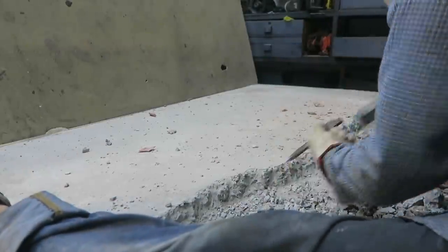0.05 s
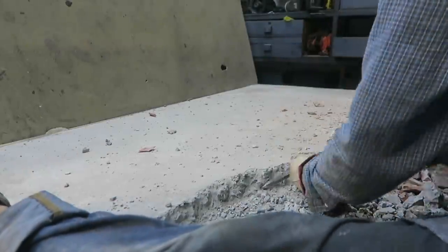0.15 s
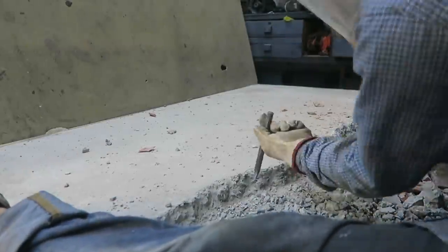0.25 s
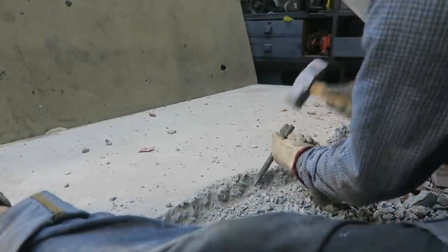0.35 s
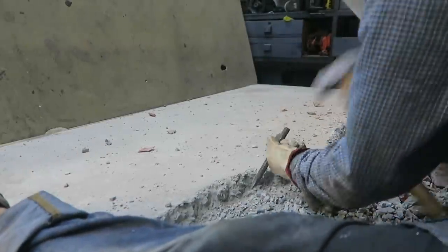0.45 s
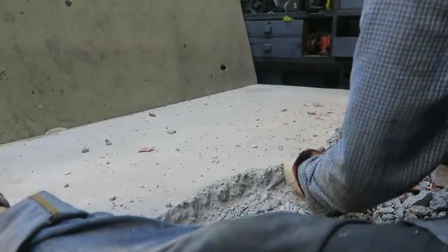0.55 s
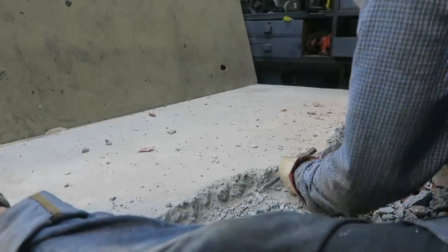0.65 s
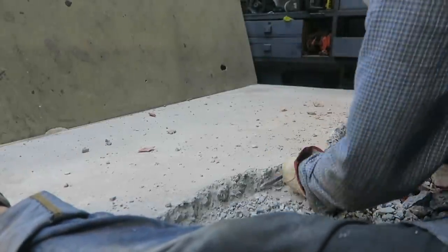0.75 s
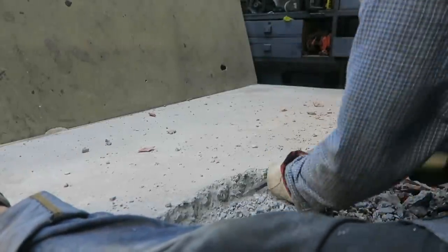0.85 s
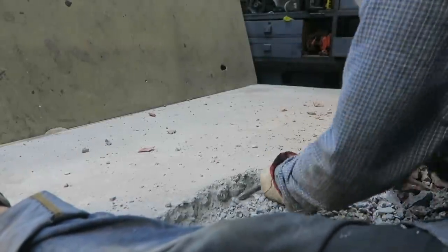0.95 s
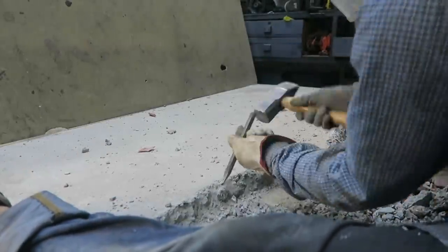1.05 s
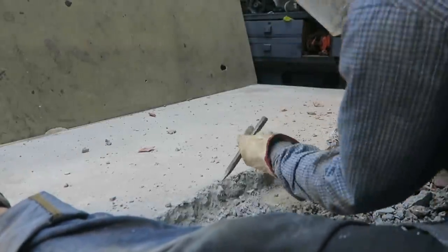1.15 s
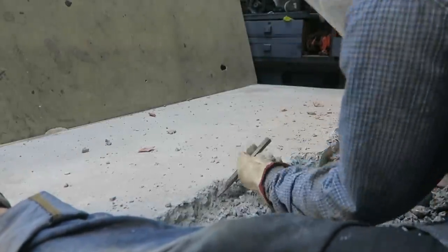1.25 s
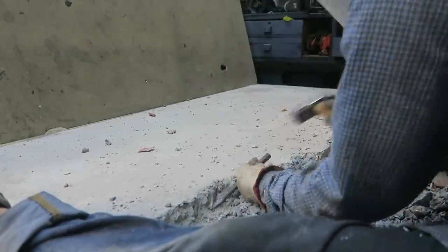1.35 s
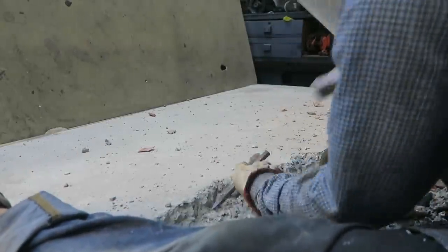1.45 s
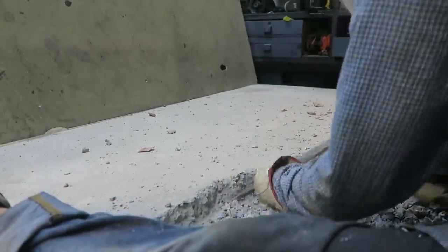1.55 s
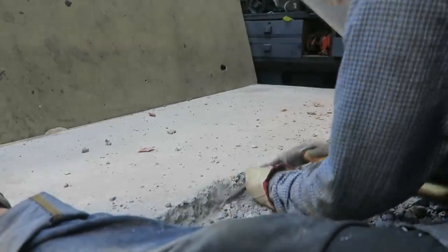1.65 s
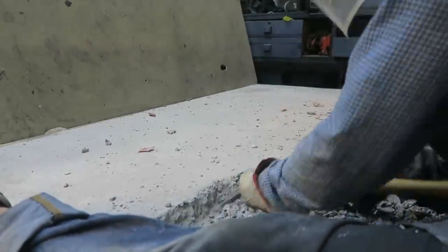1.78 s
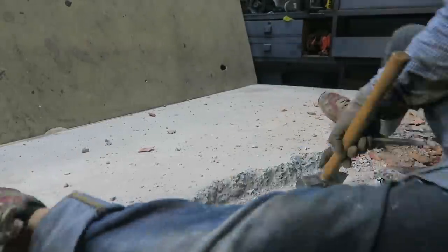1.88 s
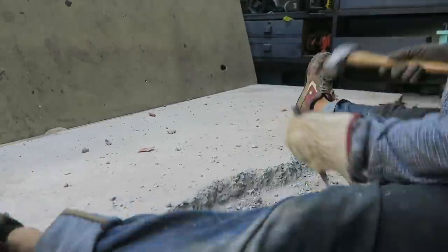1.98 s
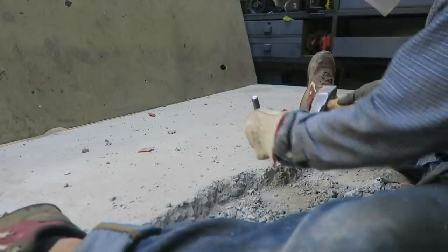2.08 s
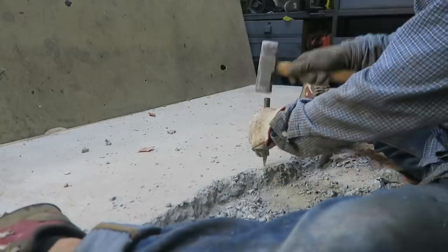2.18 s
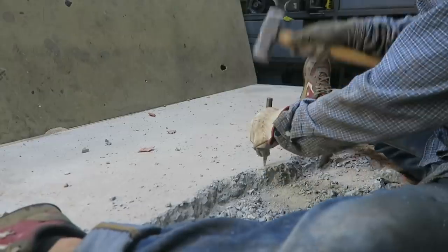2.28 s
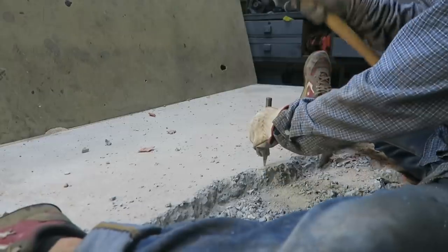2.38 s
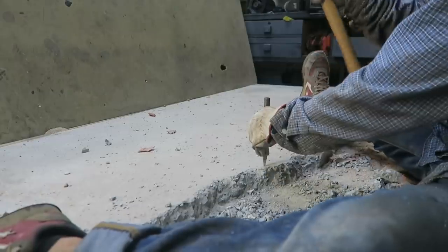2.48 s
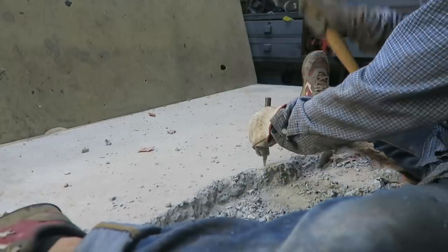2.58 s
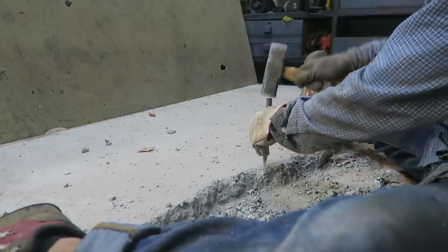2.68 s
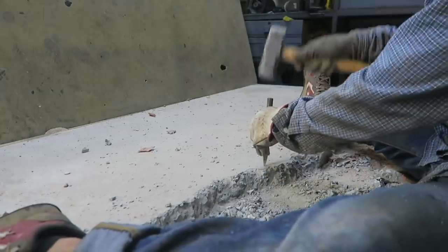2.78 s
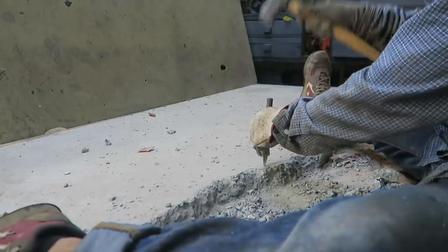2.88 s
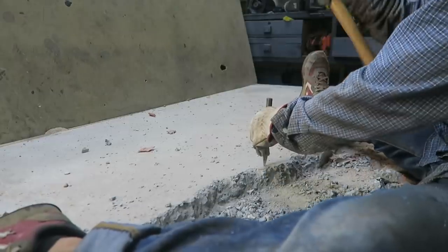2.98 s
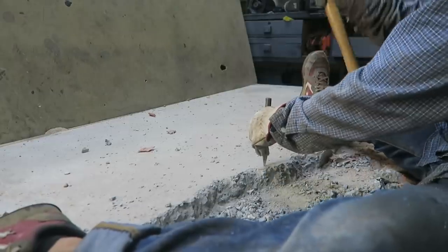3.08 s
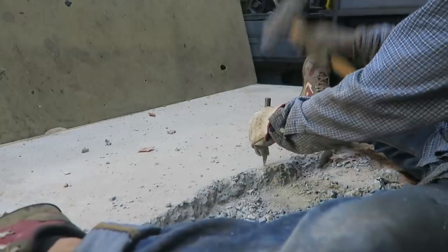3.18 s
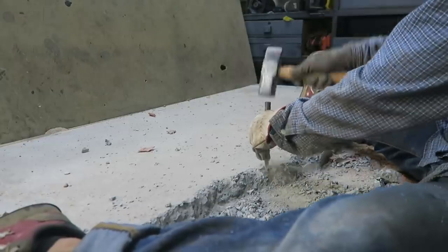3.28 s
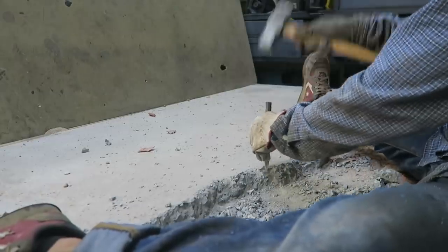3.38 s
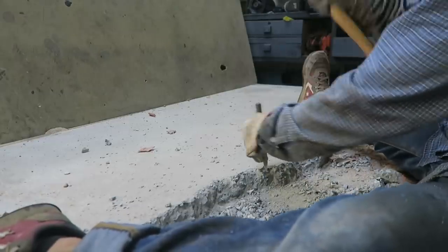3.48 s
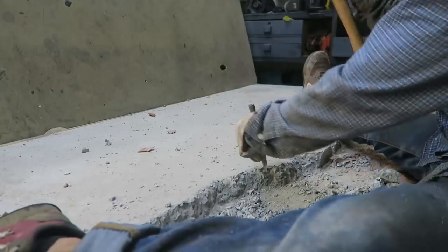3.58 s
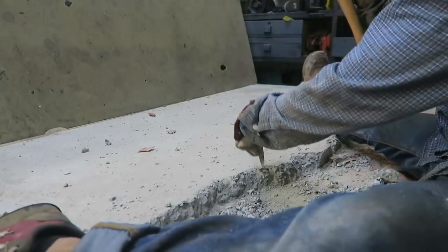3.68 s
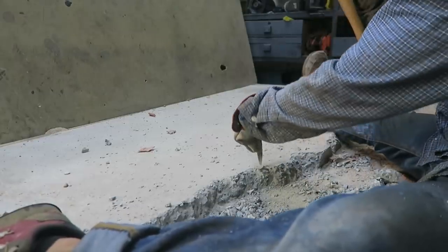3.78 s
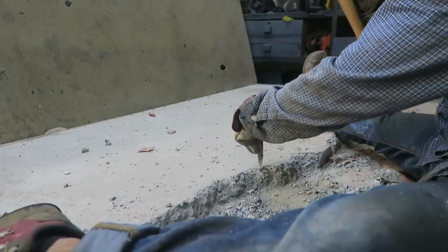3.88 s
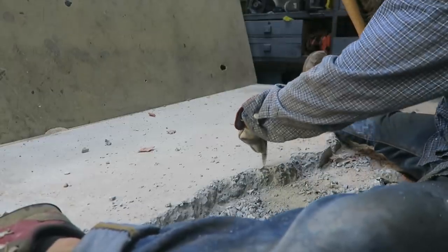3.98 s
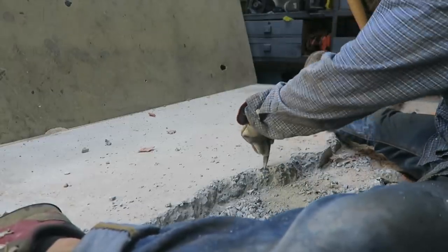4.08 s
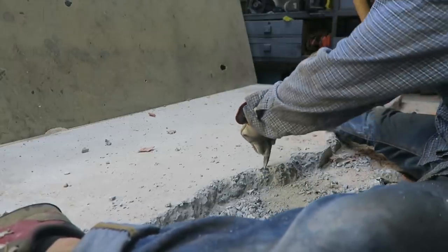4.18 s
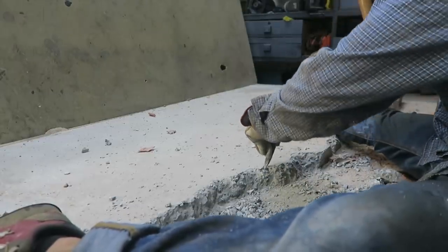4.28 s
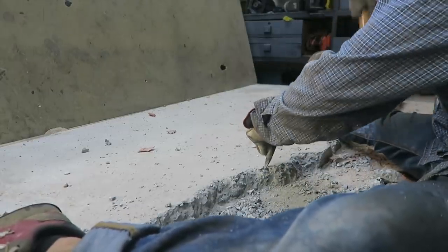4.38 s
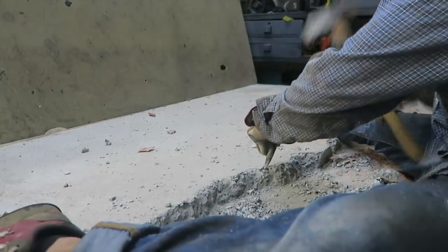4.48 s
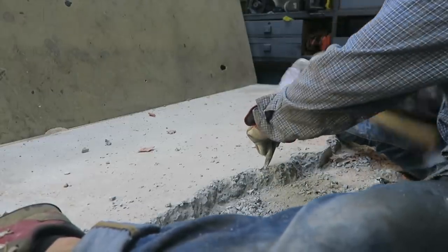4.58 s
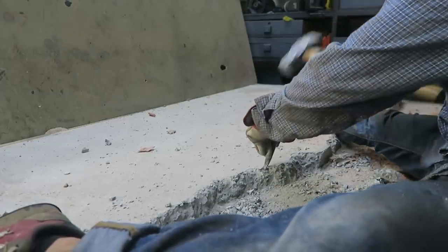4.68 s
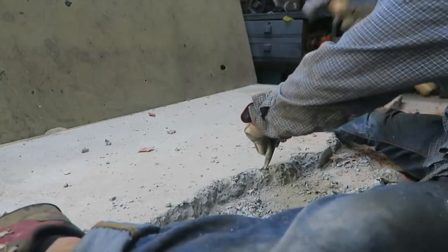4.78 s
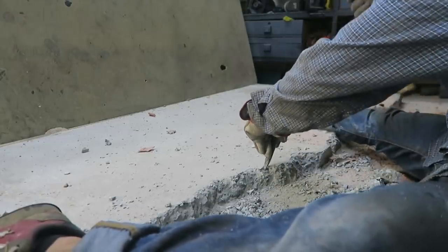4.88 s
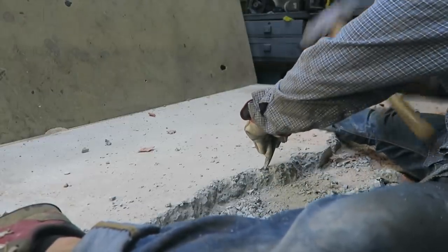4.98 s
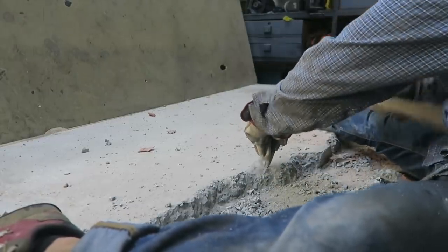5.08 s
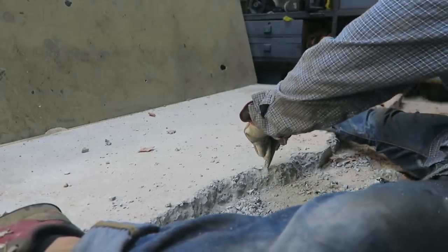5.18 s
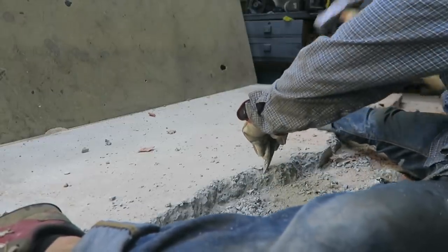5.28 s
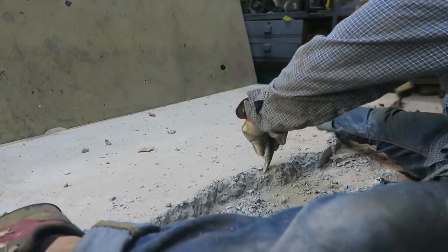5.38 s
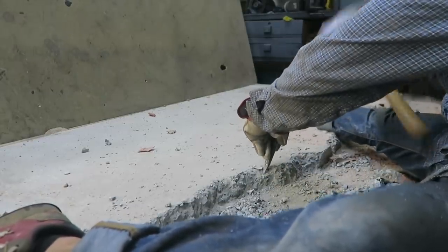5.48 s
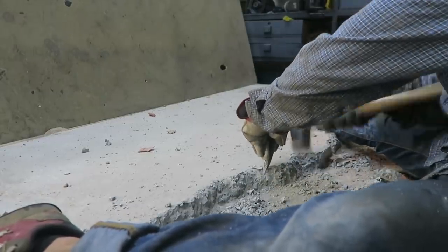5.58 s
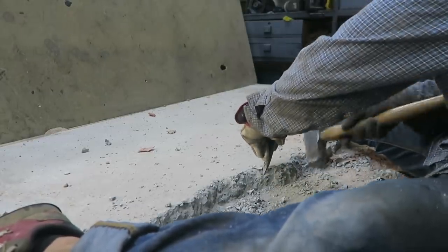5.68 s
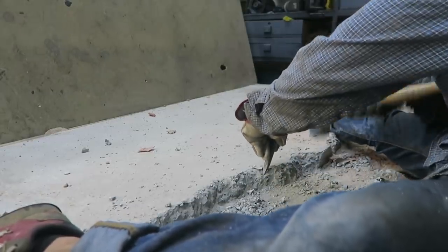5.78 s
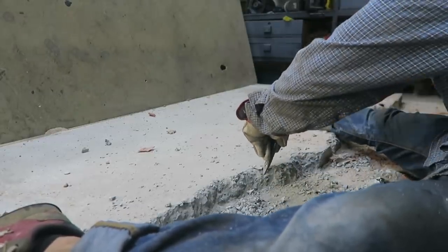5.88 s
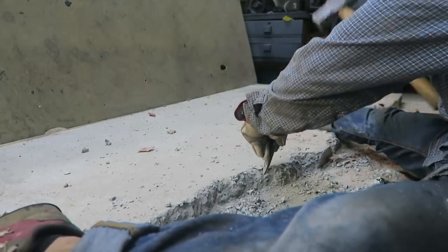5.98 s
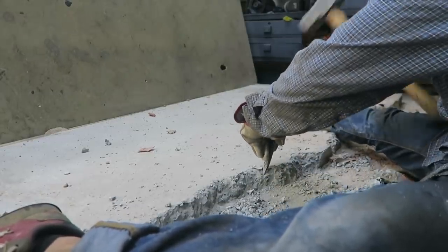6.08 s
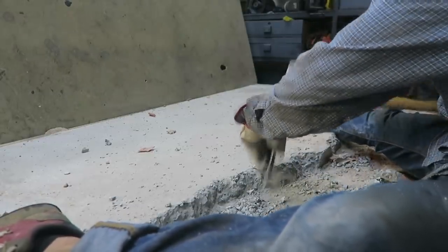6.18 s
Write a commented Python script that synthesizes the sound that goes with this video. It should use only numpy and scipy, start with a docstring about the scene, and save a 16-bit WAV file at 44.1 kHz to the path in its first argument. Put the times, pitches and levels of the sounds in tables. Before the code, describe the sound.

From 0 to about 2.2 seconds, chiselling work runs greatly sped up: dense bursts of tiny, sharp ticks, roughly forty a second within a burst, over a bright grainy hiss that swells and dips, with brief swishes near 1.1 and 1.3 seconds and a stronger rush just before 2. Then true speed begins abruptly. A hammer strikes a steel chisel in concrete at 2.2, 2.75, 3.3, 4.6, 5.1 and 5.6 seconds. Each blow is a hard midrange knock with a dull slab thump, a short crushing crackle, damped steel ringing and a brief workshop reverberation. The first rings highest, the second is loudest, and the last is softer and duller. Between blows, low rumble, soft rustling and padded bumps follow the worker shifting; two light chisel taps come near 4.2. Close miking, with clipped peaks.

```python
"""First comes a rush of tiny ticks over a hiss: the work goes by about twenty times too fast for two seconds.
Then a hammer drives a steel chisel into a concrete slab in a workshop: six blows at true speed.
Each blow adds a knock, a dull slab note, a burst of crushing noise, ringing steel and the room's answer.
Between the blows are dull bumps, a soft rustle and two light taps; the loudest peaks clip."""
import sys
import numpy as np
from scipy import signal
from scipy.fft import rfft, irfft
from scipy.io import wavfile

SR = 44100
rng = np.random.default_rng(int(sys.argv[2]) if len(sys.argv) > 2 else 0)


def to_wav(sig):
    """Store sig (one row per channel, or 1-D mono) as 16-bit WAV at the path in sys.argv[1].

    Samples outside -1..1 are clipped; the rate is SR.
    """
    pcm = np.clip(np.atleast_2d(sig), -1, 1) * 32767
    pcm = np.round(pcm).astype(np.int16)
    wavfile.write(sys.argv[1], SR, pcm.T)  # frames by channels


N = 275625
TIME = np.arange(N) / SR  # seconds
TRUE_SPEED_S = 2.19  # the work runs at true speed from here


def from_db(db):
    """Turn decibels into a plain multiplier."""
    return 10 ** (np.asarray(db) / 20)


def rms_one(x):
    """Scale a sound to an average strength (rms) of 1."""
    return x / np.sqrt(np.mean(x ** 2) + 1e-20)


def in_time(rows):
    """Draw straight lines between the points of a level curve, one value per sample."""
    seconds, level_db = np.transpose(rows)
    return np.interp(TIME, seconds, level_db)


def at_hz(points, hz):
    """Read a curve at any pitch, with pitch spaced in octaves as the ear hears it."""
    point_hz, value = np.transpose(points)
    return np.interp(np.log(np.maximum(hz, 1)), np.log(point_hz), value)


def cut(x, hz, kind, order=2):
    """Keep only low, high or middle pitches with a Butterworth filter."""
    safe_hz = np.clip(hz, 10, .48 * SR)
    return signal.sosfilt(signal.butter(order, safe_hz, kind, fs=SR, output="sos"), x)


def shelf(x, hz, db):
    """Lift or lower the treble above a corner."""
    return x + (from_db(db) - 1) * cut(x, hz, "high", order=1)


def add(out, seconds, sound):
    """Mix a sound in at a time."""
    start = max(round(seconds * SR), 0)
    out[..., start:start + sound.shape[-1]] += sound[..., :N - start]


def dying(t, t60):
    """A fade that loses 60 dB in t60 seconds, as a struck object does."""
    return from_db(-60 * t / t60)


def drift(rate_hz):
    """Random wandering with spread 1, slower than rate_hz."""
    wander = cut(rng.standard_normal(N + SR), rate_hz, "low")
    return rms_one(wander[SR:])  # drop the filter's first second


def colour_by(x, curve):
    """Raise or lower each pitch of a sound by a curve in dB."""
    spectrum = rfft(x)
    hz = np.arange(len(spectrum)) * SR / len(x)
    return irfft(spectrum * from_db(at_hz(curve, hz)), len(x))


def noise(colour, size):
    """Random hiss, coloured by a curve and scaled to rms 1."""
    return rms_one(colour_by(rng.standard_normal(size), colour))


def stereo_noise(colour, width, size):
    """Coloured hiss with a second hiss added left and subtracted right, which makes it wide."""
    side = colour_by(noise(colour, size), width)
    return noise(colour, size) + side * [[1], [-1]]


def ring(modes, t, pitch=1, scatter_db=0):
    """A struck object sounds as a sum of dying sines, each with a chance strength at every strike."""
    total = 0
    for k, (hz, db, t60) in enumerate(modes):
        strength = from_db(db + scatter_db * rng.normal())
        sign = (-1) ** k
        total = total + sign * strength * dying(t, t60) * np.sin(2 * np.pi * hz * pitch * t)
    return total


# stereo width of background and room: (pitch [Hz], side against mid [dB])
WIDTH = [(60, -48), (400, -16), (1300, -23.5), (2400, -18), (4400, -5.5), (8000, 3.5), (15000, 16.5)]
# colour of the low rumble: (pitch [Hz], relative level [dB])
RUMBLE_COLOUR = [(20, -18.5), (45, -9), (100, 0), (200, 1.5), (330, -1.5), (470, -2.5), (600, -26),
                 (1000, -56.5), (8000, -70.5)]
# colour of the soft rustle: (pitch [Hz], relative level [dB])
RUSTLE_COLOUR = [(300, -23), (600, -1.5), (1000, -1.5), (1500, 0.5), (2200, -3), (3000, -11), (4500, -22),
                 (7000, -32.5), (9500, -45.5), (16000, -53.5)]
# rustle as the worker shifts about, before rustle_db: (time [s], level [dB])
SHIFTING = [(2.2, -29.5), (2.37, -43), (2.74, -40.5), (2.91, -46), (3.42, -45), (3.74, -46), (4.24, -40.5),
            (4.37, -39.5), (4.59, -36.5), (4.77, -46), (5.17, -42), (5.27, -46), (6.09, -45), (6.25, -42)]


def background(flutter_db=0.92, lumpy_db=2.2, rustle_db=1.0, rumble_db=-42.0, rumble_follows=.7):
    """A lumpy low rumble and a soft rustle, both noise, swell as the worker shifts."""
    shifting_db = in_time(SHIFTING)
    swell_db = shifting_db - shifting_db[TIME > TRUE_SPEED_S].mean()
    rumble_level = from_db(rumble_db + rumble_follows * swell_db + lumpy_db * drift(35.15))
    rumble = rumble_level * stereo_noise(RUMBLE_COLOUR, WIDTH, N)
    rustle_level = from_db(rustle_db + shifting_db + flutter_db * drift(27))
    rustle = rustle_level * stereo_noise(RUSTLE_COLOUR, WIDTH, N)
    return (rumble + rustle) * np.clip((TIME - TRUE_SPEED_S) / 0.0022, 0, 1)


# sped-up rustle, before gain_db: (time [s], level [dB])
RUSH = [(0.0, -42.5), (0.4, -41), (0.68, -38.5), (0.74, -32.5), (1.03, -38.5), (1.19, -50), (1.33, -35),
        (1.46, -43.5), (1.65, -37.5), (1.73, -44), (1.88, -34), (1.94, -24.5), (2.1, -23.5), (2.22, -30.5)]
# colour of the sped-up rustle: (pitch [Hz], relative level [dB])
RUSH_COLOUR = [(30, -6), (200, -11.5), (500, -11), (900, -6.5), (1400, -4.5), (2300, -1.5), (3500, -0.5),
               (7000, -2), (9500, -6), (11000, -7), (15500, -4), (16300, -25)]
# stereo width of the sped-up rustle: (pitch [Hz], side against mid [dB])
RUSH_WIDTH = [(60, -11), (700, -14), (2000, -54), (15000, -42)]
# swishes of the arm and tools in fast motion: (time [s], peak level [dB])
SWISHES = [(.155, -43.5), (0.281, -38.5), (.555, -43), (1.113, -30), (1.268, -34), (1.795, -36)]


def rush(flutter_db=3.0, gain_db=-5.5, grains_per_s=200, grains_db=-1.5,
         rise_db_per_s=221, fall_db_per_s=456, end_s=2.23):
    """Sped up, the rustle is a bright hiss, each arm move a swish and the dull bumps fine grains."""
    swishes = 0
    for peak_s, peak_db in SWISHES:
        below_peak_db = np.maximum((peak_s - TIME) * rise_db_per_s, (TIME - peak_s) * fall_db_per_s)
        swishes = swishes + from_db(peak_db - below_peak_db)
    hiss = from_db(flutter_db * drift(380)) * stereo_noise(RUSH_COLOUR, RUSH_WIDTH, N)
    clicks = (rng.random(N) < grains_per_s / SR) * rng.standard_normal(N)
    grains = from_db(grains_db) * rms_one(cut(clicks, [2500, 9500], "band", order=3))
    level = np.hypot(from_db(in_time(RUSH) + gain_db), swishes)
    return level * (hiss + grains) * (TIME < end_s)


# heavier bumps of the worker shifting, before gain_db: (time [s], level [dB], time to fade 60 dB [s])
HEAVY_BUMPS = [(2.215, -24, .04), (2.358, -15.5, 0.039), (2.686, -22, .018), (3.017, -26, 0.022),
               (3.088, -16.5, 0.064), (3.221, -20.5, .015), (3.261, -24.5, .025), (3.568, -23.5, 0.015),
               (3.741, -24.5, 0.014), (4.273, -27, 0.034), (4.306, -25, .018), (4.478, -19, .025),
               (4.96, -23.5, 0.012), (5.029, -25.5, 0.015), (5.235, -26, .018), (5.465, -19.5, 0.01),
               (5.576, -19.5, 0.017), (5.812, -22.5, 0.026), (5.879, -22.5, 0.038), (6.097, -23.5, .02),
               (6.154, -16.5, 0.021)]


def bumps(swell_s=0.00326, settle_db=-10.0, settle_t60=0.13, top_hz=520, gain_db=1.5, scatter_db=3.5,
          centre_hz=336.2, pitch_spread=.07, light_per_s=5, light_db=-31.5, light_t60=0.017):
    """Padded contacts: a brief dull thud and a short settling noise, with light ones between the heavy."""
    out, t = np.zeros(N), TIME[:SR // 8]
    light = []
    # one light bump at a chance moment in each time slot
    for slot_s in np.arange(TRUE_SPEED_S, TIME[-1], 1 / light_per_s)[:-1]:
        light.append((slot_s + rng.random() / light_per_s, light_db + scatter_db * rng.normal(), light_t60))
    for peak_s, level_db, t60 in HEAVY_BUMPS + light:
        hz = centre_hz * np.exp(pitch_spread * rng.normal())
        swell = np.minimum(t / swell_s, 1) * dying(np.maximum(t - swell_s, 0), t60)
        thud = swell * np.sin(2 * np.pi * hz * t) * rng.choice([-1, 1])
        settle = from_db(settle_db) * noise(RUMBLE_COLOUR, len(t)) * dying(t, settle_t60)
        add(out, peak_s - swell_s, from_db(level_db + gain_db) * (thud + settle))
    return cut(out, top_hz, "low", order=8)


# chisel set down lightly on the stone: (time [s], level [dB])
TAPS = [(4.178, -37.5), (4.205, -47)]
# notes of the loosely held chisel, before the tap level: (pitch [Hz], level [dB], time to fade 60 dB [s])
TAP_MODES = [(783, 7, 0.064), (1256, 8.5, 0.044), (2630, 8.5, 0.053), (6850, -19.5, .12),
             (12400, -18, 0.11)]


def taps():
    """The tip touches the stone as the chisel is moved on, and its loosely held steel rings."""
    out, t = np.zeros(N), TIME[:SR // 4]
    for tap_s, level_db in TAPS:
        add(out, tap_s, from_db(level_db) * ring(TAP_MODES, t))
    return out


# bursts of fast hammering, average values before chance and the band gains in ticks:
# (first blow time [s], last blow time [s], level [dB], bass [dB], treble [dB])
BURSTS = [(.0295, .1083, -35.5, 3, 4.5), (.1378, .2125, -37, 2, 8.5), (.288, .3392, -33, 1, 5),
          (.396, .4728, -33.5, -8, 4), (.4999, .4999, -29, -1, 2), (.561, .561, -28.5, -4, 4),
          (.6044, .6044, -35.5, 5, 6), (.643, .6671, -31.5, -1, 2), (.7105, .7598, -35, 4, 3),
          (.806, .8307, -31.5, -1, -4), (.875, .975, -30.5, 0, -2), (1.007, 1.0326, -33, 0, -1),
          (1.1238, 1.1724, -31, 0, 3), (1.271, 1.2975, -36, 0, 7), (1.3419, 1.3922, -30, -3, -1),
          (1.418, 1.494, -32.5, 3, 4), (1.5313, 1.5814, -34.5, 2, 3), (1.6283, 1.727, -35, 4, 6),
          (1.804, 1.852, -34.5, 1, 6)]


def fast_blows(scatter_db=1.2, colour_db=2.5, swing_s=.0255):
    """Within a burst the hammer keeps an even pace, while force, bass and treble vary a little."""
    for first_s, last_s, *levels_db in BURSTS:
        swings = max(round((last_s - first_s) / swing_s), 0)
        for blow_s in np.linspace(first_s, last_s, swings + 1):
            yield blow_s, *(levels_db + rng.standard_normal(3) * [scatter_db, colour_db, colour_db])


def ticks(tail_db=-3.5, tail_t60=0.018, snap_t60=0.0017, spike=6.3,
          bass_db=-7.0, mid_db=-1.7, treble_db=0.0):
    """In fast motion a blow is one sharp spike and a noise tail of a few milliseconds."""
    out, t = np.zeros((2, N)), TIME[:SR // 40]
    for blow_s, level_db, low_db, high_db in fast_blows():
        fade = dying(t, snap_t60) + from_db(tail_db) * dying(t, tail_t60)
        snap = rng.standard_normal(len(t)) * fade
        snap[0] += spike * rng.choice([-1, 1])
        bass = cut(snap, [35, 1500], "band")
        middle = -cut(snap, [1500, 7000], "band")  # inverted so that the bands join without notches
        treble = cut(snap, [7000, 16000], "band")
        gains = from_db([bass_db + low_db, mid_db, treble_db + high_db])
        tick = sum(gain * rms_one(band) for gain, band in zip(gains, [bass, middle, treble]))
        tick = tick * np.sqrt(.005 / t[-1])  # count the level as if all energy fell within 5 ms
        balance = from_db(rng.normal(0, 0.69) * np.array([[1], [-1]]))  # a little left or right
        add(out, blow_s, from_db(level_db) * tick * balance)
    return out


# how long the room rings at each pitch: (pitch [Hz], time to fade 60 dB [s])
ROOM_T60 = [(100, 0.61), (500, 0.23), (1400, 0.38), (3700, 0.38), (9700, 0.3), (16000, 0.15)]


def workshop(colour, first_s=0.0086, early_db=-2.0, early_t60=0.31):
    """Room sound is noise that rises softly, is stronger early on and dies at its own pace in each octave."""
    t = TIME[:SR * 3 // 5]
    spectrum = rfft(stereo_noise(colour, WIDTH, len(t)))
    hz = np.arange(spectrum.shape[-1]) * SR / len(t)
    octave = np.log2(np.clip(hz, 125, 16000) / 125)
    out = 0
    for k in range(8):
        band = irfft(spectrum * np.maximum(1 - abs(octave - k), 0), len(t))
        out = out + band * dying(t, at_hz(ROOM_T60, 125 * 2 ** k))
    out = out * np.minimum(t / first_s, 1) ** 4 * (1 + from_db(early_db) * dying(t, early_t60))
    return out / np.sqrt(np.sum(out ** 2) / 2)  # unit energy, averaged over the two sides


# an even spectrum: (pitch [Hz], relative level [dB])
FLAT = [(20, 0), (20000, 0)]


def reverberate(x):
    """The room draws a short note out into a rough, wavering band."""
    return signal.fftconvolve(x[None], workshop(FLAT), axes=-1)[:, :len(x)]


# hammer blows; the levels adjust the parts before force: (time [s], force [dB], slab thump [dB],
# floor boom [dB], bite of the tip [dB], chisel ring [dB], room [dB], knock pitch [ratio],
# clang pitch [Hz], clang level [dB], lingering note pitch [Hz], lingering note level [dB])
BLOWS = [(2.2303, 0.5, -1, -33, 4, 2, 0, 1.01, 1400, -18.5, 8150, -33),
         (2.7528, 2.5, 3.5, -44, -2.5, -18.5, 0, 1.03, 3520, -8, 478, -17.5),
         (3.3119, -2, -3.5, -48.5, -1, -24, 3, 0.977, 1136, -10, 3600, -23),
         (4.6312, 1, -3.5, -21, 0.5, -36, -1, 1.018, 2880, -1.5, 1595, -16),
         (5.1253, -3, -6, -45, 1, -35, 2, 1.01, 2200, -1, 10470, -23),
         (5.6386, -5, -9, -46, -19, -31, 3, 1.075, 1180, -4.5, 2370, -24)]
# The notes below have columns (pitch [Hz], level before the blow's gains [dB], time to fade 60 dB [s]).
# knock of chisel and concrete
KNOCK = [(460, -14, 0.024), (741, -3.5, 0.017), (1212, -1.5, 0.014), (1440, -3, 0.014), (1840, -6, 0.015),
         (2136, -9.5, 0.011), (2783, -12.5, 0.0073), (3312, -5, 0.022), (4340, -12.5, 0.0092)]
# the slab's dull answer
SLAB = [(165.4, -15, .04), (260, -10, 0.026)]
# lengthwise ring of the steel, damped by the glove
CHISEL = [(12310, 0, .055), (12370, -25, .2), (8150, -27, .12)]
# notes of hammer and chisel, soon damped by the hands
STEEL = [(428, -24.5, .06), (776, -19.5, .06), (930, -34, .06), (1113, -20.5, 0.074), (1420, -21, .07),
         (1510, -19.5, .07), (1619, -22, .06), (1831, -22.5, 0.041), (1950, -17, 0.086), (2080, -18, .07),
         (2150, -20, .07), (2694, -24, .06), (3160, -23, 0.18), (3380, -21.5, .06), (3660, -23, 0.067),
         (3877, -33.5, 0.064), (4280, -28.5, .06), (4870, -22.5, .06), (5440, -25, .06), (6160, -28, .06),
         (6360, -32.5, .05), (7250, -28.5, .04), (8150, -31.5, .04), (10500, -29, .025),
         (12330, -28.5, .02)]
# long notes of the chisel shank, in close groups that beat
SHANK = [(3660, -32, .3), (3800, -35, .3), (5230, -34, .27), (5275, -35, .27), (7380, -41, .2),
         (8150, -42, .2), (10310, -42, .2), (10365, -39, .25), (10450, -39, .2), (12190, -45, .2),
         (12275, -41, .22), (12325, -38, .24), (12470, -44, .2)]
# colour of splitting concrete: (pitch [Hz], relative level [dB])
CRACK_COLOUR = [(200, -63), (900, -8), (3000, 6.5), (5000, -0.5), (8000, -12.5), (12000, -7),
                (16000, -23.5)]
# colour of the room's answer to the crack: (pitch [Hz], relative level [dB])
ROOM_COLOUR = [(60, -18), (170, -13), (320, -6.5), (470, -2.5), (600, -2), (780, -1), (1100, -6.5),
               (1700, -1.5), (2500, -7.5), (3500, -7), (5500, -16), (8000, -16.5), (11000, -28.5),
               (16000, -43.5)]


def blows(crack_db=-12.0, crush_s=0.0021, crack_t60=0.02, room_db=13.5, ring_room_db=-18.0,
          steel_direct_db=-10.0, clang_room_db=0.0, room_top_hz=13000, bite_hz=4000,
          boom_hz=51, boom_t60=.07, clang_t60=0.019, linger_t60=0.2):
    """Each blow knocks the tip into the slab, crushes concrete for a moment and sets the steel ringing."""
    out, t = np.zeros((2, N)), TIME[:SR * 3 // 5]
    for (blow_s, force_db, thump_db, boom_db, bite_db, ring_db, wet_db, pitch,
         clang_hz, clang_db, note_hz, note_db) in BLOWS:
        knock = ring(KNOCK, t, pitch, scatter_db=2.0)
        boom = ring([(boom_hz, boom_db, boom_t60)], t)
        slab = from_db(thump_db) * ring(SLAB, t) + boom
        crushing = np.minimum(t / 0.00022, 1) * dying(np.maximum(t - crush_s, 0), crack_t60)
        crack = from_db(crack_db) * noise(CRACK_COLOUR, len(t)) * crushing
        # grip and seat of the tip change, so each blow favours other notes
        steel = ring(STEEL, t, 1 + .003 * rng.normal(), scatter_db=2.5)
        steel = steel + ring([(note_hz, note_db, linger_t60)], t)
        chisel = from_db(ring_db) * ring(CHISEL, t) * np.minimum(t / .0012, 1)
        # one broad resonance stands out, set by how the tip is wedged
        clang = ring([(clang_hz, clang_db, clang_t60)], t)
        room = from_db(room_db) * workshop(ROOM_COLOUR)
        room = room + reverberate(steel + from_db(ring_room_db) * chisel)
        room = room + from_db(clang_room_db) * reverberate(clang)
        room = cut(room, room_top_hz, "low", order=6)
        bright = crack + from_db(steel_direct_db) * steel + from_db(wet_db) * room
        clank = clang + shelf(bright, bite_hz, bite_db)
        shank = from_db(bite_db * .5) * ring(SHANK, t, 1 + .001 * rng.normal(), scatter_db=2.0)
        add(out, blow_s, from_db(force_db) * (knock + slab + clank + chisel + shank))
    return out


def scene():
    """Fast motion first, then the work at true speed."""
    return background() + rush() + bumps() + taps() + ticks() + blows()


def record(dry, ceiling=.93, cutoff_hz=16400):
    """An overloaded input flattens peaks above its ceiling; then the highest pitches are cut."""
    clipped = np.clip(dry, -ceiling, ceiling)
    return signal.sosfiltfilt(signal.butter(12, cutoff_hz, fs=SR, output="sos"), clipped)


dry = scene()
out = record(dry)
to_wav(out)
```